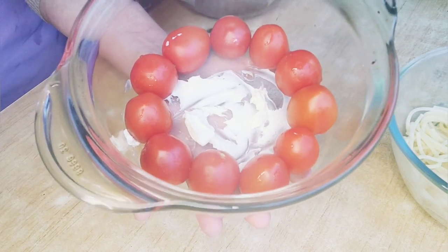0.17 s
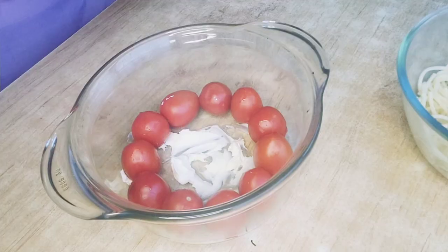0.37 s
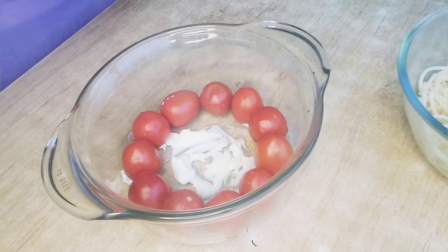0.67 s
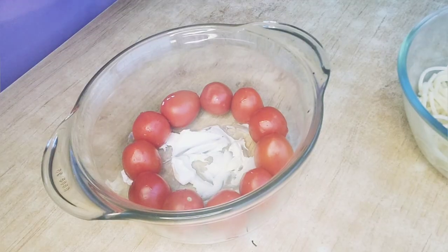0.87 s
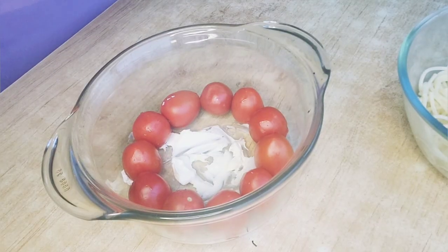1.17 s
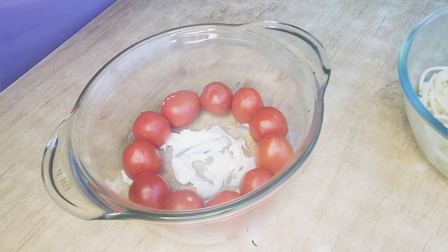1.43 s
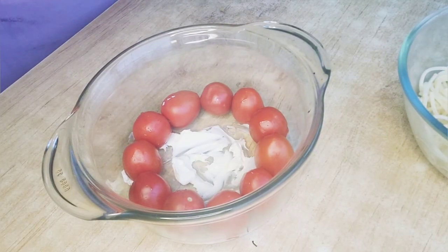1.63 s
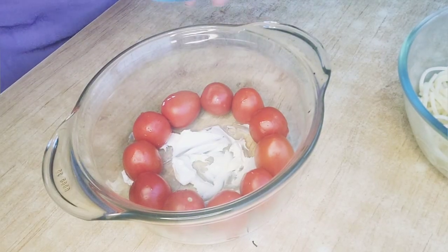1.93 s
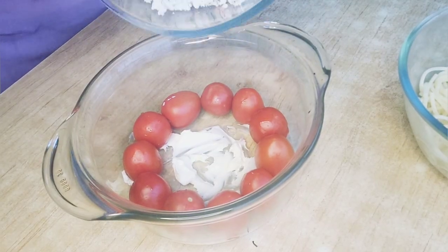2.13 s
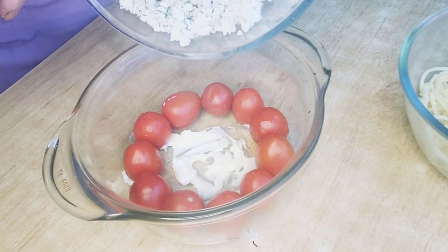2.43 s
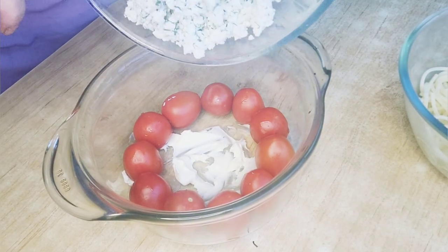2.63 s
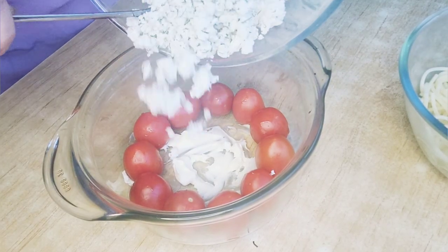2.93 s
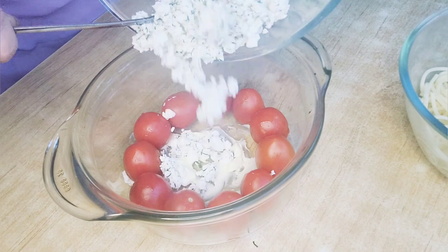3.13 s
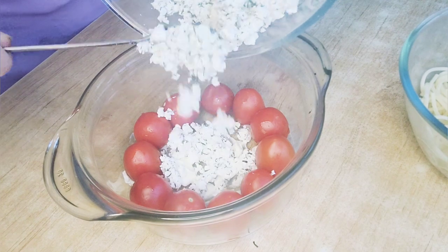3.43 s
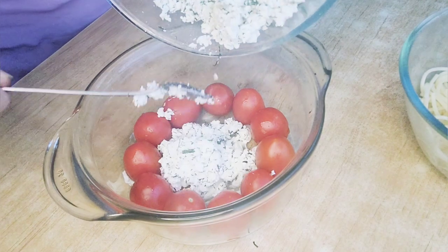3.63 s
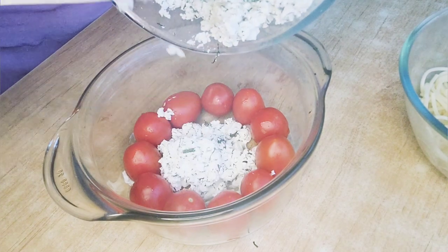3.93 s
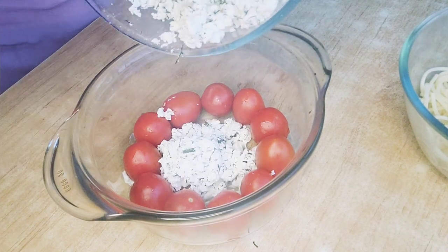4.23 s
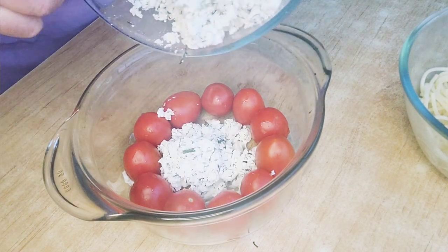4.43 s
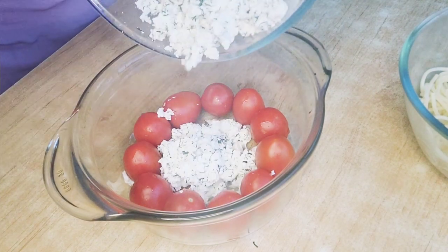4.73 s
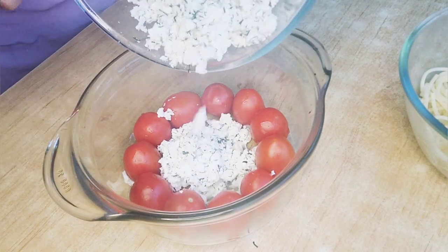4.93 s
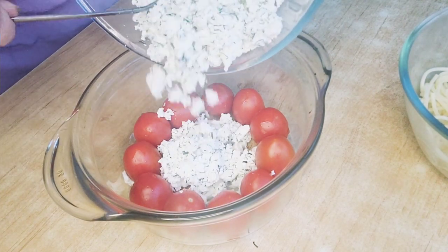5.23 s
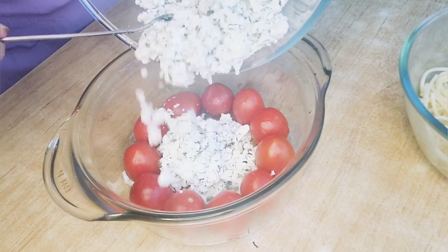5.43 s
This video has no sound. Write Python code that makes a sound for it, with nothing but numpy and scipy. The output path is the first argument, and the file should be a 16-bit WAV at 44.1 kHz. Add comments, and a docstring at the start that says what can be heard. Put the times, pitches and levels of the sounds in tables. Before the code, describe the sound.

A small kitchen, heard close in stereo, with a very quiet, wavering low appliance drone, mains hum and thin hiss throughout. After a barely audible rustle at the start, a metal spoon lightly knocks a hand-held glass bowl at about 0.8, 0.9 and 1.0 s, with short gritty scrapes between and a faint glassy hum after. At 1.5 s a bright, clear clink rings on the rim with a quick softer rebound; a faint scrape at 1.9 leads to a tighter, damped tap at 2.05. Around 3.0 to 3.3 s soft curds fall into the glass dish: small hollow pats, crisp tiny ticks and low handling bumps. A very faint touch and rustle come at 3.5. At 4.36 s a strong, sharp glass clink rings with a bounce and short decay. Sparse, faint crumb ticks follow at 5.1 and 5.3 over the drone until the end at about 5.6.

```python
"""A low appliance drone over microphone hiss and a soft rustle open the scene in a small kitchen.
Then a spoon taps and scrapes a hand-held glass bowl: each tap rings the split twin modes of bowl and spoon,
with a noise crack, a low thump and a bounce; each scrape is grainy noise that wakes the same modes.
Soft curds go into a glass dish: crumbs tick as bright noise bursts, clumps land as a hollow resonant pat.
A finger rubs single modes into humming, handling rumbles low, and a short reverb holds the close sounds."""
import sys
import numpy as np
from scipy import signal
from scipy.fft import rfft, irfft, next_fast_len
from scipy.io import wavfile

SR = 44100
rng = np.random.default_rng(int(sys.argv[2]) if len(sys.argv) > 2 else 0)


def bounce(signal):
    """Save signal as a 16-bit WAV file at the path given by the first command-line argument."""
    frames = np.transpose(np.atleast_2d(signal))
    limited = np.clip(frames, -1, 1)
    pcm = np.round(limited * 32767).astype(np.int16)
    wavfile.write(sys.argv[1], SR, pcm)


N = 246633

# microphone hiss colour: (frequency [Hz], relative level [dB])
HISS_TONE = [(530, -31), (900, -13.5), (1450, -5), (4490, -11.5), (7300, -13.5), (8250, -10), (15200, -12),
             (16500, -27)]
HISS_DB = -85
# likeness of the two channels of wide noise: (frequency [Hz], likeness [1 same, -1 opposite, clipped there])
LIKENESS = [(60, 0.19), (130, 0.95), (290, 0.75), (640, 0.69), (1410, -0.38), (3100, -1.6), (6820, -1),
            (15000, -0.13)]

# appliance level over time: (time [s], rush level [dB], mains level [dB])
DRONE_LEVELS = [(0.0, -68.5, -76), (0.23, -68.5, -60), (0.84, -60, -79), (1.18, -63.5, -77.5),
                (1.6, -61, -68), (2.18, -67.5, -80), (2.74, -68.5, -72.5), (3.07, -63, -68),
                (3.28, -63, -74), (3.72, -63.5, -78), (3.91, -65, -75), (4.36, -62, -71),
                (4.72, -65.5, -81), (5.59, -75, -74)]
# colour of the rush: (frequency [Hz], relative level [dB])
DRONE_TONE = [(12, -41), (20, -12), (38, -8), (60, -5.5), (76, -17), (97, -6), (152, -15), (181, -5.5),
              (205, -17), (254, -7), (369, 1), (508, -9.5), (607, -5.5), (898, -29.5), (1400, -41.5),
              (1820, -72), (3080, -120)]
# wavering motor tones: (frequency [Hz], width [Hz], level [dB])
MOTOR_TONES = [(188.4, 4, -83), (404.1, 9.2, -76), (566, 8, -81)]
MAINS_HZ, MAINS_WAVER_DB = 48.8, 4.5
# short low swells as bowl and dish are handled: (centre time [s], length [s], level [dB])
HANDLING = [(.1, 0.44, -75), (0.92, 0.22, -71), (1.461, .15, -74), (2.98, 0.12, -62), (3.334, 0.13, -58.5),
            (5.155, 0.1, -69)]
LOW_PAN_DB = -1.5   # left over right, for rush, motor tones and handling

KITCHEN_T60_S, KITCHEN_DB = 0.33, -19   # decay time in the bass
WALL_CUT_HZ = 14000   # here the decay is shorter by the square root of two

# soft rustles of sleeve and crumbs: (centre time [s], length [s], level [dB], middle of band [Hz])
RUSTLES = [(0.016, 0.16, -81.5, 5560), (0.287, 0.0096, -78, 1560), (0.257, .03, -80, 8550),
           (3.042, 0.053, -74, 11000), (3.546, 0.026, -71, 10830), (4.041, 0.078, -85, 6030),
           (5.032, 0.096, -90, 5154)]
# loudest sticky crumbs parting: (time [s], burst level before filtering [dB])
TICKS = [(2.8727, -62), (3.0075, -45), (3.0444, -71), (3.07, -78), (3.1356, -74), (3.2033, -63),
         (3.4192, -69), (5.0611, -69), (5.1011, -69), (5.3082, -68.5), (5.322, -68), (5.342, -68.5),
         (5.3581, -72)]
# span in which faint ticks fall at random: (earliest [s], latest [s])
FAINT_TICKS_S = (2.4, 5.5)
FAINT_TICK_DB = -83.5
# loudest clumps landing in the dish: (time [s], burst level before filtering [dB])
PATS = [(2.9794, -56), (3.0071, -39.5), (3.0594, -47), (3.0944, -68), (3.1444, -72), (3.2344, -51.5),
        (3.2505, -52), (3.3094, -56)]
TRAIL_DB = -5   # the smaller clump after each pat
DISH_HZ, DISH_WIDTH_HZ = 2170, 250

# finger rubs on the bowl: (centre time [s], length [s], mode [Hz], width [Hz], level [dB])
RUBS = [(1.19, .08, 1978, 6, -73), (2.44, 0.07, 4480, 120, -84), (2.575, 0.04, 4450, 120, -86),
        (2.57, .05, 1978, 30, -86), (3.47, 0.05, 1975, 10, -89)]
# spoon strokes over the glass: (full pressure from [s], gathering time [s], hold [s], hiss level [dB])
SCRAPES = [(0.785, 0.032, 0.08, -62.5), (0.894, 0.0082, 0.086, -54), (1.014, 0.0064, 0.035, -50),
           (1.873, 0.1, 0.016, -60)]
# colour of the scrape: (frequency [Hz], relative level [dB])
SCRAPE_TONE = [(410, -45), (700, -9), (922, -8.5), (1060, -3.5), (1180, -8), (1300, -5.5), (2130, -3),
               (4380, -4), (16000, -10)]
SCRAPE_FADE_S, GRAIN_DB = 0.022, 2.5   # GRAIN_DB: spread of the catches

# second contact of the spoon on the glass: (delay on the left [s], delay on the right [s])
BOUNCE_S = (.01267, .01365)
BOUNCE_DB = -4.5
# mode pitches of bowl and of spoon: (frequency [Hz])
BOWL_HZ = [434, 1088, 1973, 3077, 4369, 4402, 4549, 4980, 5905, 5950, 6966, 7605, 7709, 7958, 8058, 8795,
           9014, 9512, 10011, 11510, 13330, 13880, 14834, 15487]
SPOON_HZ = [1310, 2180, 2500, 3655, 4188, 4657, 8473, 10700, 11640]
# modes in pitch order: (free t60 [s], twin beat [Hz], struck on rim [dB], on wall [dB], on foot [dB],
# inside [dB], left over right [dB])
BOWL_MODES = [(0.7, 1.3, -33.5, -40.5, -53, -53, 16.5), (1.2, 5.5, -35.5, -38, -80, -61.5, 9.5),
              (0.36, 7, -16.5, -27, -56.5, -54.5, -4), (0.3, -2, -15, -24.5, -76, -52.5, -3.5),
              (0.07, 8.2, -14.5, -12, -39, -36.5, 10), (0.3, 34, -28.5, -23.5, -44.5, -46.5, 3),
              (0.07, 17, -27, -22, -34, -41.5, 2), (0.082, 14, -26, -36, -48, -51.5, 3.5),
              (0.26, 27, -52, -33.5, -111, -56.5, 1), (0.083, 26, -37, -25, -37, -43, 7),
              (0.075, 21, -26.5, -30, -60, -50, -2), (0.13, 23, -20, -16.5, -63, -49, 3),
              (0.14, 26, -27.5, -17, -56, -53, 5), (0.077, 75, -8.5, -14.5, -46, -45, 7.5),
              (0.02, 81, -5.5, -13, -34, -42, 4.5), (0.07, 50, -17, -33.5, -52, -41.5, -0.5),
              (0.039, 22, -17, -14.5, -43, -58.5, -5.5), (0.11, 13, -18.5, -27, -71, -65.5, 8.5),
              (0.053, 58, -19.5, -15.5, -66, -49.5, 3), (0.21, 60, -23.5, -31, -89, -55.5, 10.5),
              (0.07, 78, -20.5, -32, -35, -59, 8), (0.16, 45, -22, -26, -52, -62.5, 6.5),
              (0.064, 3, -12, -35.5, -49, -73.5, 2), (0.079, 13, -12, -32, -41, -67, 3)]
SPOON_MODES = [(0.15, 6.7, -44, -34.5, -71, -42, -9.5), (0.07, 8.2, -46.5, -35.5, -47.5, -85.5, 2.5),
               (0.072, 9.5, -55.5, -43, -77, -49, -1), (0.044, 5.6, -50, -35.5, -84, -44.5, 4.5),
               (0.07, 11, -35, -24, -40.5, -45.5, 4), (0.0688, 18, -40, -33, -37, -54.5, 4),
               (0.076, 21, -16.5, -18, -41, -46.5, 5.5), (0.14, 36, -22.5, -35.5, -50, -59, 1.5),
               (0.07, 30.53, -25, -19, -35, -60, 9)]
# the striking places, in the order of the level columns above
SPOTS = ["rim", "wall", "foot", "inside"]
# taps: (time [s], spot, strength [dB], twin share [-1 to 1, by where round the bowl it is struck],
# finger damping at 1 kHz [1/s], rise [ms], contact [ms], crack level [dB], thump level [dB])
TAPS = [(0.765, "inside", -4, 0.66, 33, 3.2, 0.061, -33, -90),
        (0.895, "inside", -6, .47, 1.6, 4.2, 0.075, -31, -96.5),
        (1.018, "inside", -6.5, -0.26, 63, 10.5, 0.044, -51, -87.5),
        (1.0450, "inside", -16.5, .47, 2.5, 11, 0.16, -44, -83),
        (1.5062, "rim", -1, -0.27, 0.32, 0.79, 0.07, -11.5, -41.5),
        (2.047, "foot", 0.5, 0.61, 60, 0.67, 0.08, -25.5, -80),
        (3.005, "foot", -45, .47, 130, 2.03, .04, -61, -64.5),
        (3.531, "wall", -36, 0.76, 15, 2.4, 0.44, -60, -98),
        (4.3632, "wall", -2, 0.78, 11.8, 3.23, 0.063, -7, -47.5)]
# how rings reach left and right: (frequency [Hz], left lead [rad], twin level [dB], twin left over right [dB])
FACING = [(441.8, 0.33, -1.5, 6.5), (1079.6, 1.5, -4, 11.5), (1973, 2.39, 5.5, -1.5), (3077, 0.9, -6, 2),
          (4400, 0.85, -2, -3), (8000, 1, -1, -3), (15400, 4, 0, -5)]
# the table swelling and dying under the thump: (frequency [Hz], time to peak [s], relative level [dB])
TABLE_THUMP = [(55, .012, -4), (127.97, .009, -1), (254, .007, -4)]
TWIN_LEAD, TWIN_LASTS = -1.8, 1.35   # radians added to the lead, and multiple of t60
STILLING = 0.15   # share of the next tap's grip that damps what still rings

CUTOFF_HZ = 16900


def amp(db):
    """Gain for a level in dB."""
    return 10 ** (np.asarray(db) / 20)


def rms_one(x):
    """Scale a signal to rms 1."""
    return x / np.sqrt(np.mean(x ** 2) + 1e-20)


def curve(rows, column=1):
    """Gain along a dB column of a table in time."""
    times, levels_db = np.array(rows).T[[0, column]]
    return amp(np.interp(np.arange(N) / SR, times, levels_db))


def bump(s, length):
    """A smooth swell centred at s seconds."""
    return np.exp(-.5 * ((np.arange(N) / SR - s) / (length / 2)) ** 2)


def at_hz(points, hz, column=1):
    """Read a table column at given frequencies, along a logarithmic pitch scale."""
    points = np.array(points)
    return np.interp(np.log(np.maximum(hz, 1)), np.log(points[:, 0]), points[:, column])


def coloured(x, spectrum):
    """Shape a stereo signal by (frequency [Hz], level [dB]) points; rms 1."""
    gain = amp(at_hz(spectrum, np.fft.rfftfreq(N, 1 / SR)))
    return rms_one(irfft(rfft(x) * gain, N))


def stereo_noise():
    """White noise whose channels agree most in the low range and oppose each other in the treble."""
    mid, side = rfft(rng.standard_normal((2, N)))
    alike = np.clip(at_hz(LIKENESS, np.fft.rfftfreq(N, 1 / SR)), -1, 1)
    return irfft(np.sqrt(1 + alike) * mid + np.sqrt(1 - alike) * side * [[1], [-1]], N)


def resonate(x, hz, width_hz):
    """A two-pole resonance: the narrower it is, the longer it rings."""
    r = np.exp(-np.pi * width_hz / SR)
    feedback = [1, -2 * r * np.cos(2 * np.pi * hz / SR), r * r]
    return signal.lfilter([(1 - r * r) / 2, 0, (r * r - 1) / 2], feedback, x + 1e-18)


def band(x, low_hz, high_hz):
    """Keep the band between two frequencies."""
    sos = signal.butter(2, [low_hz, min(high_hz, .45 * SR)], "band", fs=SR, output="sos")
    return signal.sosfilt(sos, x + 1e-18)


def add(out, x, s):
    """Mix a sound in at s seconds."""
    at = round(s * SR)
    out[..., at:at + x.shape[-1]] += x[..., :N - at]


def low_pan(x):
    """Lean a stereo signal to one side."""
    return x * amp(LOW_PAN_DB * np.array([[.5], [-.5]]))


def microphone_hiss():
    """Steady coloured noise, independent on each side."""
    return amp(HISS_DB) * coloured(rng.standard_normal((2, N)), HISS_TONE)


def appliance():
    """A low rushing drone, wavering motor tones from narrow noise, and a wavering mains hum."""
    tones = sum(amp(db) * rms_one(resonate(stereo_noise(), hz, width_hz)) for hz, width_hz, db in MOTOR_TONES)
    rush = curve(DRONE_LEVELS) * coloured(stereo_noise(), DRONE_TONE)
    waver = amp(MAINS_WAVER_DB * signal.resample(rng.standard_normal(40), N))
    mains = np.sqrt(2) * np.sin(2 * np.pi * MAINS_HZ * np.arange(N) / SR)
    mains = curve(DRONE_LEVELS, column=2) * waver * mains * amp([[-2], [2]])
    return low_pan(rush + tones) + mains


def kitchen(x):
    """Twelve feedback delays a side, duller on every round and smeared by allpasses."""
    size = next_fast_len(N + SR)
    hz = np.fft.rfftfreq(size, 1 / SR)
    t60 = KITCHEN_T60_S / (1 + (hz / WALL_CUT_HZ) ** 2) ** .5
    echo = np.zeros((2, len(hz)), complex)
    for k, lag in enumerate(np.geomspace(.0071, .0337, num=24)):
        loop = amp(-60 * lag / t60) * np.exp(-2j * np.pi * hz * lag)
        echo[k % 2] += loop / (1 - loop) * (-1) ** (k // 2)
    for lag in (.0013, .0031, .0047):
        turn = np.exp(-2j * np.pi * hz * lag)
        echo *= (turn - .6) / (1 - .6 * turn)
    apart = 1 / (1 + (700 / (hz + 1)) ** 2)   # long waves reach both sides alike
    echo = echo.mean(0) + apart * (echo - echo.mean(0))
    echo *= hz / (hz + 250)   # thin doors let the deepest sound escape
    return irfft(rfft(x, size) * amp(KITCHEN_DB) * echo, size)[:, :N]


def handling_rumble():
    """Short low swells of noise around 300 Hz as bowl and dish are handled."""
    swells = sum(amp(db) * bump(s, length) for s, length, db in HANDLING)
    return low_pan(swells * rms_one(band(band(stereo_noise(), 240, 360), 240, 360)))


def rustles():
    """Soft swells of noise about an octave wide."""
    return sum(amp(db) * bump(s, length) * rms_one(band(rng.standard_normal((2, N)), hz / 1.6, hz * 1.38))
               for s, length, db, hz in RUSTLES)


def curds(tick_s=0.0043, pat_s=0.007):
    """Decaying noise bursts: bright ticks of crumbs, and soft pats that sound the hollow of the dish."""
    ticks, pats = np.zeros((2, N)), np.zeros((2, N))
    t = np.arange(SR // 20) / SR
    # faint ticks come at random while the curds are worked
    faint = [(rng.uniform(*FAINT_TICKS_S), FAINT_TICK_DB + rng.normal(0, 2)) for _ in range(12)]
    for s, db in TICKS + faint:
        add(ticks, amp(db) * rng.standard_normal((2, len(t))) * np.exp(-t / tick_s), s)
    # each clump is trailed by a smaller one
    trailing = [(s + rng.uniform(.01131, .0416), db + TRAIL_DB) for s, db in PATS]
    for s, db in PATS + trailing:
        add(pats, amp(db) * rng.standard_normal(len(t)) * np.exp(-t / pat_s), s)
    bright = band(band(ticks, 7300, 20000), 7300, 20000)
    hollow = resonate(resonate(pats, DISH_HZ, 340), DISH_HZ, DISH_WIDTH_HZ)
    return bright + hollow


def rubs():
    """A sliding finger sets one mode humming: friction noise through a narrow resonance."""
    out = np.zeros((2, N))
    for s, length, hz, width_hz, db in RUBS:
        hum = resonate(resonate(rng.standard_normal((2, N)), hz, width_hz), hz, 360)
        out += amp(db) * bump(s, length) * rms_one(hum)
    return out


def stroke(s, gather_s, length):
    """Pressure gathers, holds and fades."""
    t = np.arange(N) / SR - s
    return np.exp(np.minimum(t / gather_s, 0) - np.maximum(t - length, 0) / SCRAPE_FADE_S)


def scrapes(ring_db=-8):
    """Dense tiny catches of steel on glass: a hiss that also wakes the modes."""
    catches = rng.standard_normal((2, N)) * amp(GRAIN_DB * rng.exponential(1, N))
    pressure = sum(amp(db) * stroke(s, gather_s, length) for s, gather_s, length, db in SCRAPES)
    hiss = coloured(catches, SCRAPE_TONE) * pressure
    inside_db = np.transpose(BOWL_MODES + SPOON_MODES)[2 + SPOTS.index("inside")]
    modes = sum(resonate(hiss, hz, 35) * amp(db - inside_db.mean())
                for hz, db in zip(BOWL_HZ + SPOON_HZ, inside_db))
    return hiss + amp(ring_db) * modes


def spoon_bounce(x):
    """A second contact of the spoon: the glass sound repeats about 13 ms later, softer."""
    repeats = [np.pad(side, (round(s * SR), 0))[:N] for side, s in zip(x, BOUNCE_S)]
    return amp(BOUNCE_DB) * np.array(repeats)


def table_thump(t):
    """Low tones of the table, each swelling to its peak and dying away."""
    return sum(amp(db) * (t / peak_s * np.exp(1 - t / peak_s)) ** 2 * np.sin(2 * np.pi * hz * t)
               for hz, peak_s, db in TABLE_THUMP)


def taps(flutter_db=0.5673, crack_s=0.0047):
    """A round bowl rings in slightly split twins that beat and face different ways."""
    hz = np.array(BOWL_HZ + SPOON_HZ)
    t60, beat, *spot_db, pan_db = np.transpose(BOWL_MODES + SPOON_MODES)
    sign = (-1) ** np.arange(len(hz))   # neighbouring modes start in opposite directions
    out, t = np.zeros((2, N)), np.arange(SR) / SR
    twin_gain, twin_pan_db = amp(at_hz(FACING, hz, column=2)), at_hz(FACING, hz, column=3)
    thump = table_thump(t)
    for tap, after in zip(TAPS, TAPS[1:] + TAPS[-1:]):
        s, spot, db, twin, grip, rise_ms, contact_ms, crack_db, thump_db = tap
        # fingers damp the low modes most; the grip of the next tap also stills what is left ringing
        since_next = np.maximum(t - (after[0] - s), 0) * (after[0] > s)
        gripped = abs(grip) * t + STILLING * abs(after[4]) * since_next
        held = np.exp(-np.outer(1000 / hz, gripped))
        # a half-sine push: long contacts miss the high modes
        cycles = hz * contact_ms / 1000
        soft = sign * np.pi / 4 * (np.sinc(.5 + cycles) + np.sinc(.5 - cycles))
        rise = 1 - np.exp(-t * 1000 / rise_ms)
        # the tighter the grip, up to a limit, the more each ring flutters as the fingers shift
        shifts = signal.resample(rng.standard_normal((len(hz), 110)), SR, axis=1) * (1 - np.exp(-t / .03))
        flutter = held * amp(flutter_db * min(abs(grip), 15) * shifts)
        first = (hz, 1, pan_db, 1, 0)
        second = (hz + beat, twin * twin_gain, twin_pan_db, TWIN_LASTS, TWIN_LEAD)
        for pitch, share, side_db, lasts, lead in (first, second):
            ring = np.exp(np.outer(2j * np.pi * pitch - np.log(1000) / (t60 * lasts), t)) * flutter
            level = share * soft * amp(spot_db[SPOTS.index(spot)] + db + np.outer([.5, -.5], side_db))
            turn = np.exp(1j * np.outer([.5, -.5], at_hz(FACING, hz) + lead))
            add(out, ((level * turn) @ ring).imag * rise, s)
        burst = rng.standard_normal((2, SR)) * rise * np.exp(-t / crack_s)
        crack = band(burst, 550, min(800 / contact_ms, 15000))   # shorter contacts crack brighter
        add(out, amp(crack_db) * crack + amp(thump_db) * thump * amp([[5.5], [-5.5]]), s)
    return out


def scene():
    """Close sounds, the spoon bounce and the reverb, over handling, appliance and hiss."""
    glass = taps() + scrapes() + rubs()
    near = glass + curds() + rustles()
    background = appliance() + handling_rumble() + microphone_hiss()
    return near + spoon_bounce(glass) + kitchen(near) + background


def record(dry):
    """The highest peaks are rounded, the top is cut steeply."""
    rounded = dry / (1 + (dry / .93) ** 6) ** (1 / 6)
    return signal.sosfilt(signal.cheby2(12, 60, CUTOFF_HZ, fs=SR, output="sos"), rounded)


dry = scene()
out = record(dry)
bounce(out)
```